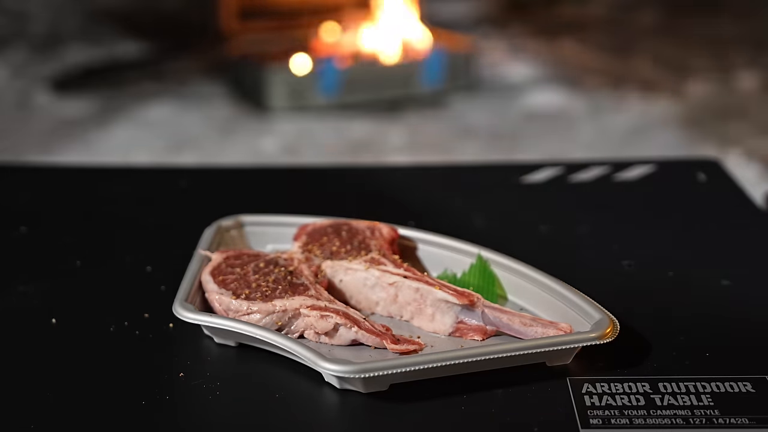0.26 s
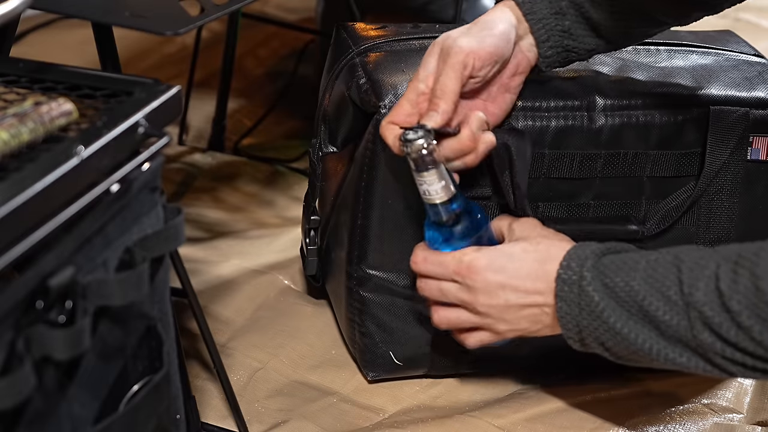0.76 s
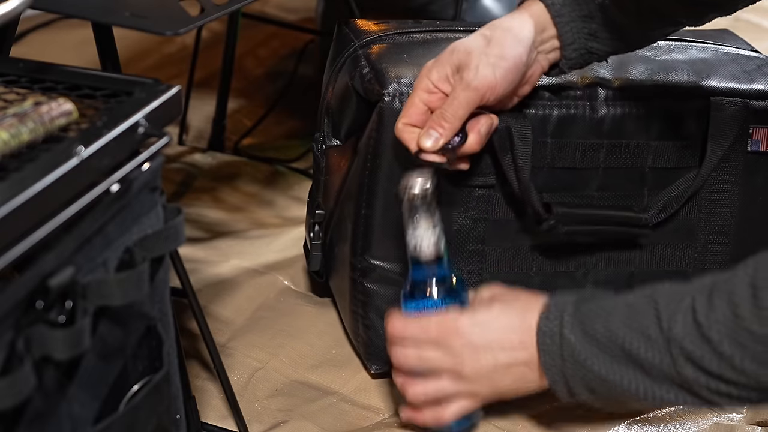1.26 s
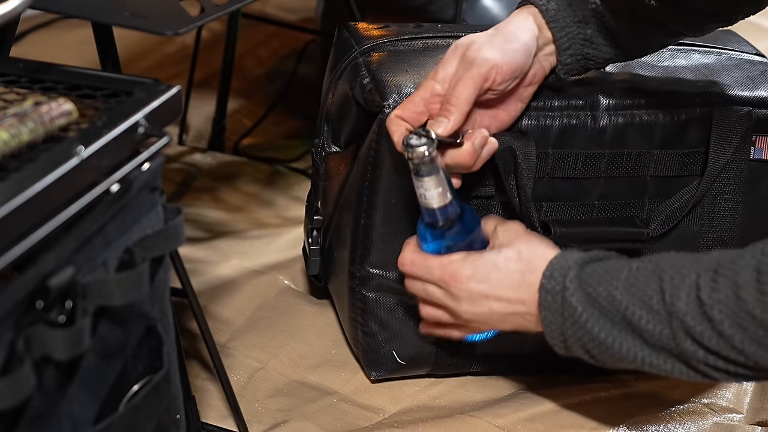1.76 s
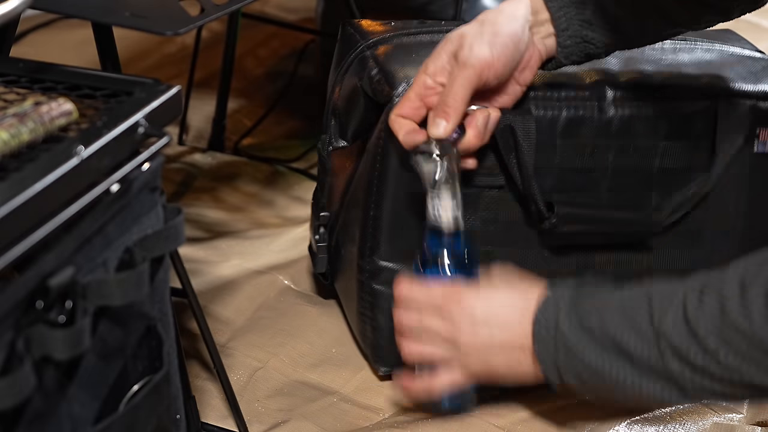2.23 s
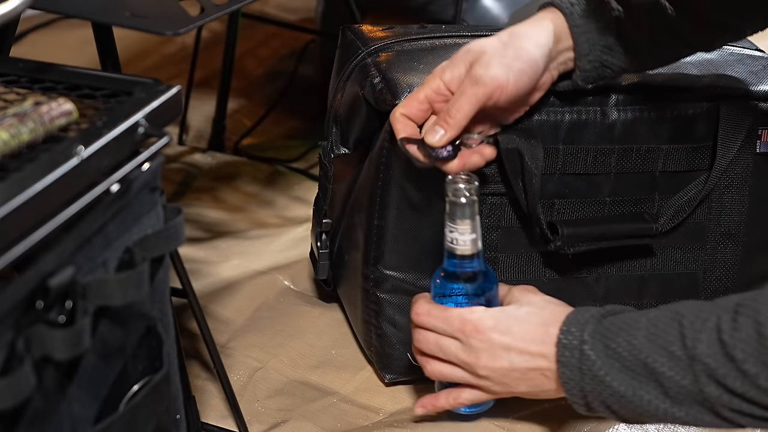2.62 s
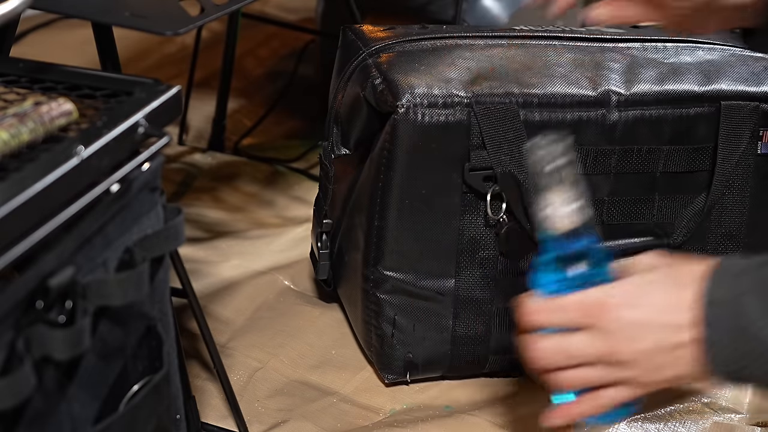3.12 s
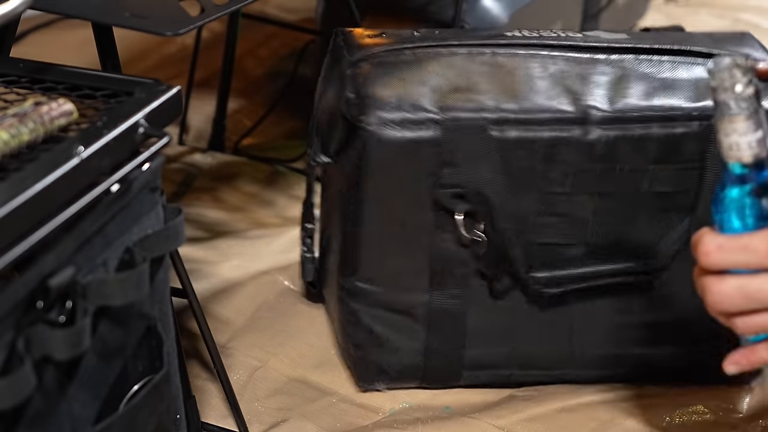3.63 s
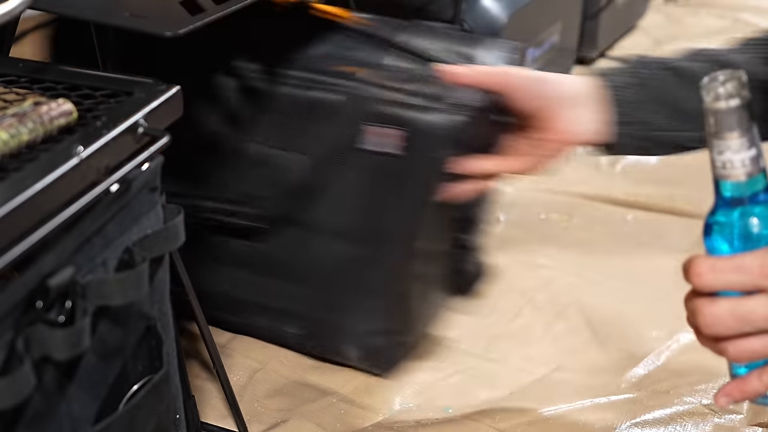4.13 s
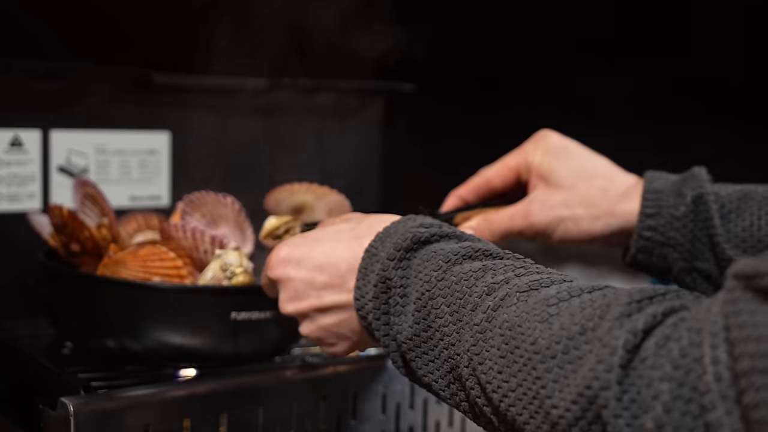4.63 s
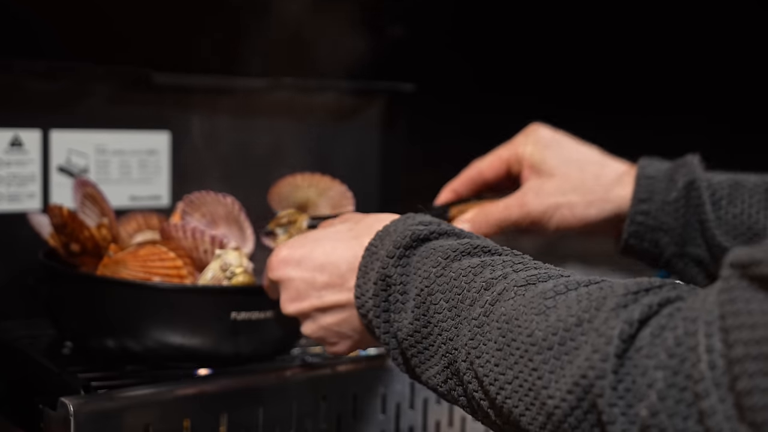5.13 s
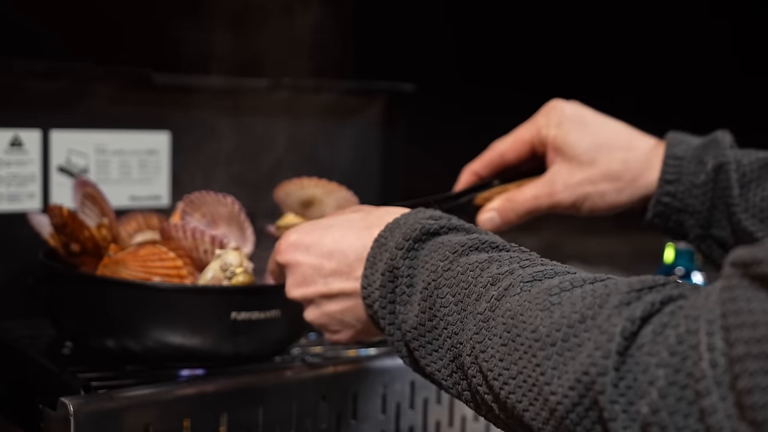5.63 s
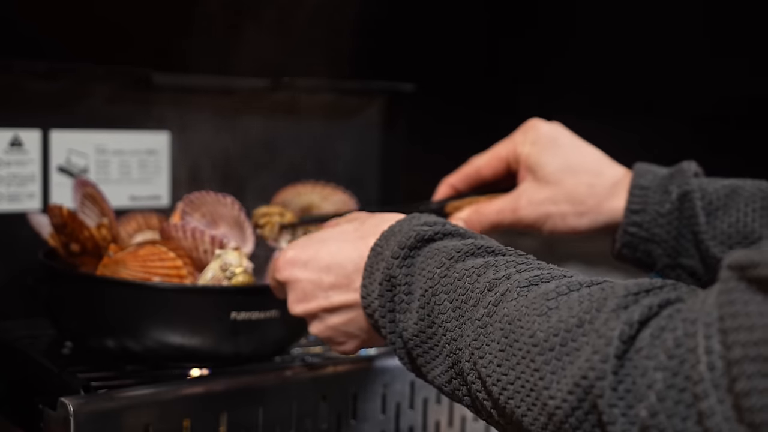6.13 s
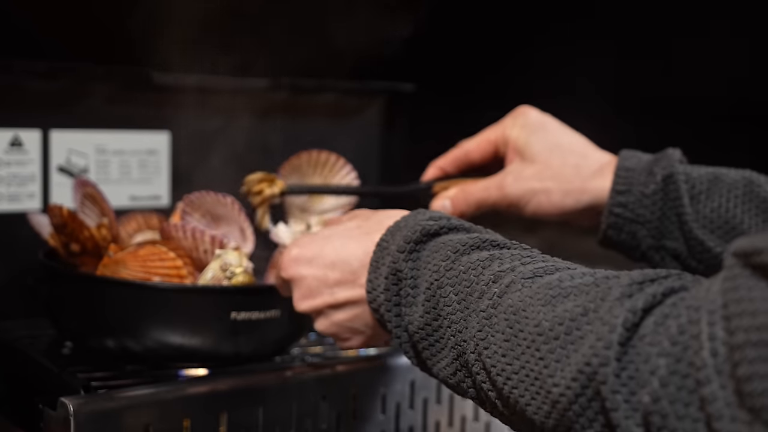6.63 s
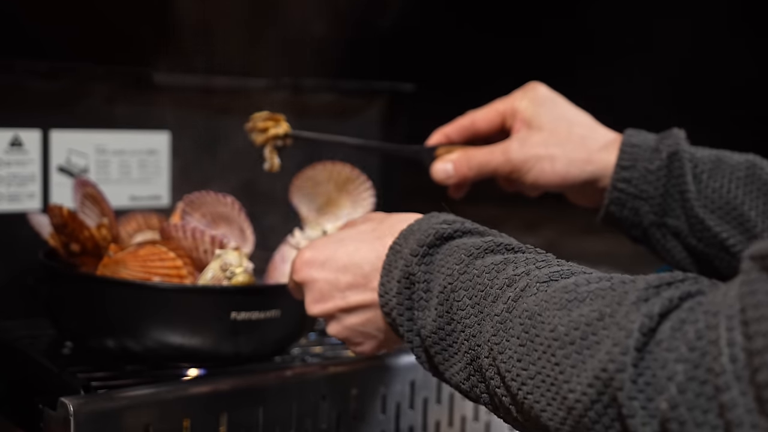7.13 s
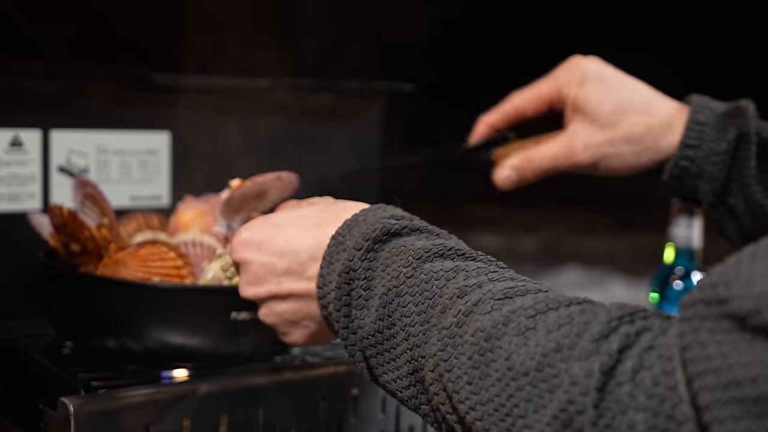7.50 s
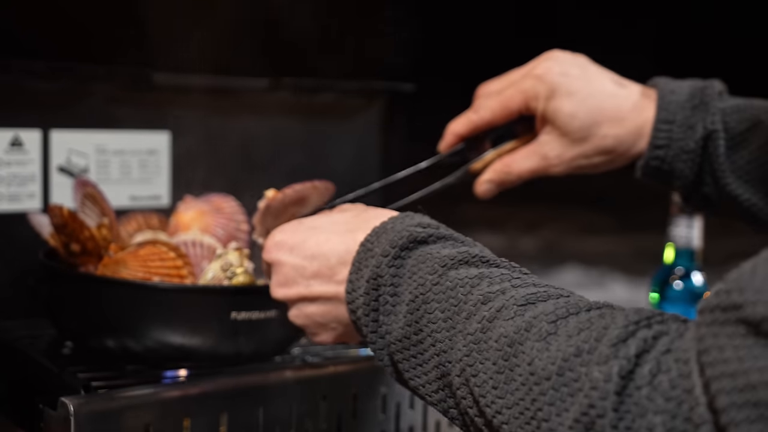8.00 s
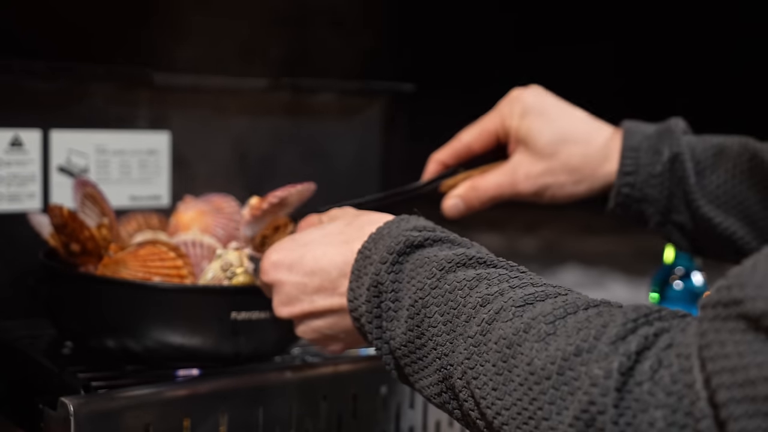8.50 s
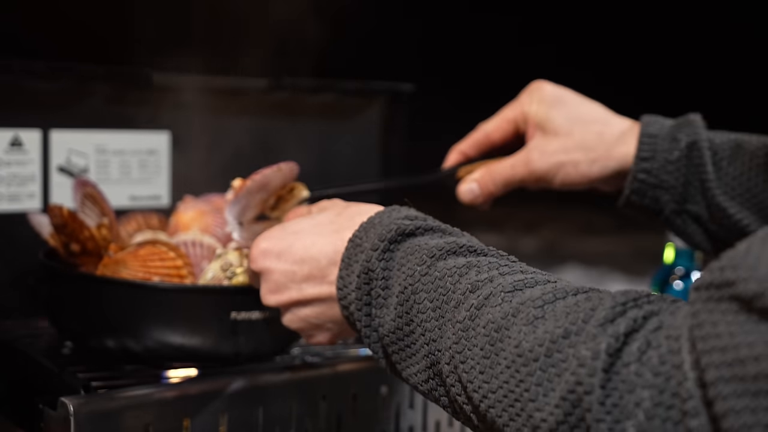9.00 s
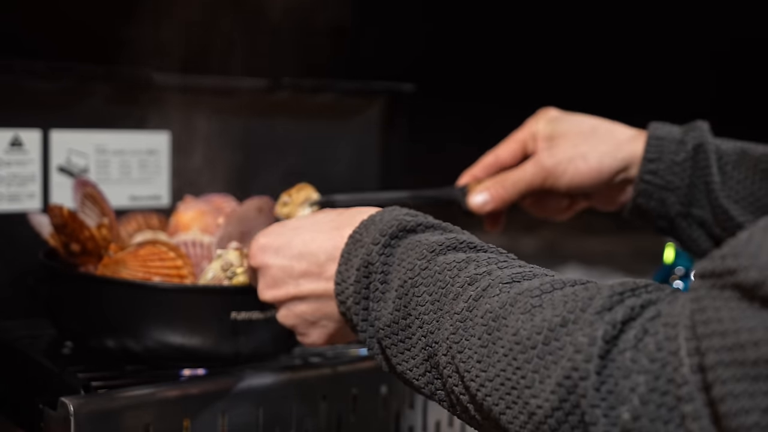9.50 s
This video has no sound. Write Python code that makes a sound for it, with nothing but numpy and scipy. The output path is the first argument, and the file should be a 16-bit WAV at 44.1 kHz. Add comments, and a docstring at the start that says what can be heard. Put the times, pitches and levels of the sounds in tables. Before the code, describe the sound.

A bottle cap is pried off with a pop, a bag is dragged, then metal tongs click and scrape on scallop shells.

```python
"""Evening in a tent, over a low rush of air. First a wood fire flutters, snaps and sings with steam.
A sleeve brushes past; an opener clicks on a bottle, gas leaks, and at 2.25 s the cap pops, rings and
drops. From 3.45 s a cooler bag is dragged over the groundsheet, its friction following its speed.
From 4.5 s tongs scrape and click on scallop shells over a pan simmering on a low gas flame; last, a
shell knocks on the pan. Impacts are noise bursts and damped modes; sliding is grainy filtered noise."""
import sys
import numpy as np
from scipy import signal
from scipy.fft import rfft, irfft, next_fast_len
from scipy.io import wavfile

SR = 44100
rng = np.random.default_rng(int(sys.argv[2]) if len(sys.argv) > 2 else 0)


def pcm_store(signal):
    """Save signal as 16-bit PCM."""
    levels = np.round(np.clip(np.atleast_2d(signal), -1, 1) * 32767)
    wavfile.write(sys.argv[1], SR, levels.astype(np.int16).T)


N = 429971
TIME = np.arange(N) / SR
STOVE_FROM_S = 4.5

# spectra of rushing air, soft hiss and metal on shell: (frequency [Hz], level [dB])
AIR_SPECTRUM = [(15, -46), (25, -37), (59, -8.5), (112, 1.5), (217, -7.5), (252, -10.5), (284, -9),
                (395, -14.5), (591, -14.5), (687, -13.5), (900, -32), (1170, -43), (1980, -120)]
HISS_SPECTRUM = [(300, -30), (600, -5), (900, 1.5), (1500, -0.5), (2200, -3), (3000, -2.5), (4600, -6),
                 (7000, -9), (10000, -12), (16000, -20)]
SCRAPE_SPECTRUM = [(300, -22), (1000, -4.5), (2000, 1.5), (2800, 2), (4500, -6), (6300, -3.5), (9000, 0.5),
                   (13000, 1), (16000, -4)]
# normal modes of the covered ground and the tongs: (frequency [Hz], level [dB], t60 [s])
GROUND_MODES = [(160, -13, 0.065), (383, 1, 0.03), (607, 3.5, 0.041), (880, 4, 0.029), (1130, -4.5, 0.027),
                (1260, 0, 0.016)]
TONG_MODES = [(1980, 6, 0.045), (3660, 8.5, 0.014), (4130, 5, 0.043), (4440, -2, .1), (4605, 9, 0.059),
              (5800, 7, 0.067), (6204, -1, 0.091), (6480, 13, 0.041), (7650, 5.5, 0.071), (8290, -3, 0.15),
              (10240, -6, 0.12), (11800, -7, 0.14)]


def amp(db):
    """Amplitude ratio of a level in decibels."""
    return 10 ** (np.asarray(db) / 20)


def unit(x):
    """Normalisation to unit energy."""
    return x / np.sqrt(np.sum(x ** 2) + 1e-20)


def add(track, s, sound):
    """Superposition: a sound joins the track at s seconds."""
    at = max(0, int(round(s * SR)))
    track[at:at + len(sound)] += sound[:max(0, N - at)]


def coloured(x, spectrum, tilt_db=0):
    """Minimum-phase filtering through (frequency [Hz], level [dB]) points, tilted per octave."""
    size = 2 * next_fast_len(len(x))
    octave = np.log2(np.maximum(np.arange(size // 2 + 1) * SR / size, 10))
    hz, db = np.transpose(spectrum)
    gain_db = np.interp(octave, np.log2(hz), db) + tilt_db * (octave - octave.mean())
    cepstrum = irfft(np.log(amp(gain_db)))
    cepstrum[1:size // 2] *= 2   # folding the cepstrum makes the filter causal
    cepstrum[size // 2 + 1:] = 0
    return irfft(rfft(x, size) * np.exp(rfft(cepstrum)))[:len(x)]


def resonate(x, hz, q):
    """Second-order resonance with unit gain at its peak."""
    return signal.lfilter(*signal.iirpeak(min(hz, .4 * SR), q, fs=SR), x)


def drift(rate):
    """Random modulation: lines join Gaussian values drawn `rate` times a second."""
    return np.interp(TIME * rate, np.arange(N), rng.standard_normal(N))


def grains(size, spread_db):
    """Heavy-tailed noise: the wider the spread of strengths, the more it crackles."""
    return rng.standard_normal(size) * amp(spread_db * np.minimum(rng.exponential(1, size), 6))


def noise(spectrum, spread_db=0):
    """Stationary coloured noise of unit rms."""
    return unit(coloured(grains(N, spread_db), spectrum)) * np.sqrt(N)


def crack(spectrum, t60):
    """Contact transient: an exponentially decaying noise burst of unit energy."""
    t = TIME[:SR // 10]
    envelope = (1 - np.exp(-t / 0.00011)) * amp(-60 * t / t60)
    return unit(coloured(rng.choice([-1, 1], len(t)) * envelope, spectrum))


def ring(modes, scatter_db):
    """Free vibration of damped modes, of unit energy; the grip shifts strength and pitch at each blow."""
    hz, db, t60 = np.transpose(modes)[:, :, None]
    t = TIME[:SR // 2]
    strength = amp(db + scatter_db * rng.standard_normal(db.shape)) * rng.choice([-1, 1], db.shape)
    hz = hz * (1 + .001 * rng.standard_normal(hz.shape))
    return unit(np.sum(strength * amp(-60 * t / t60) * np.sin(2 * np.pi * hz * t), axis=0))


def clicks(contacts, crack_t60, mid_db, resonance_db, q, modes=None):
    """Impact excitation: a crack with a contact resonance, plus any modes of the struck body."""
    out = np.zeros(N)
    for s, db, body_db, treble_db, hz, *ring_db in contacts:
        spectrum = [(200, body_db - 18), (700, body_db), (1900, body_db + 2.5), (3200, mid_db),
                    (6500, mid_db), (9000, treble_db), (15000, treble_db - 2)]
        crunch = crack(spectrum, crack_t60)
        resonance = amp(resonance_db) * unit(resonate(crunch, hz, q))
        add(out, s + 0.00093, amp(db) * unit(crunch + resonance))
        if modes:
            add(out, s + .001, amp(db + ring_db[0]) * ring(modes, scatter_db=2.5))
    return out


def strokes(swells, spectrum, spread_db):
    """Grainy noise under Gaussian envelopes, each with its own spectral tilt."""
    out, t = np.zeros(N), TIME[:SR // 2]
    for s, half_width, db, tilt_db in swells:
        hiss = unit(coloured(grains(len(t), spread_db), spectrum, tilt_db)) * np.sqrt(len(t))
        envelope = np.exp(-((t - t.mean()) / half_width) ** 2 / 2)
        add(out, s - t.mean(), amp(db) * hiss * envelope)
    return out


def tent(x, echo_s, echo_db, tail_db, t60):
    """Convolution with the direct sound, one early reflection and a short diffuse tail."""
    tail_spectrum = [(100, -5), (1000, -3.5), (4000, 6), (9000, 6.5), (16000, 5)]
    t = TIME[:SR // 2]
    tail = rng.standard_normal(len(t)) * amp(-60 * t / t60) * np.clip((t - .003) / 0.0082, 0, 1)
    response = amp(tail_db) * unit(coloured(tail, tail_spectrum))
    add(response, 0, np.ones(1))
    add(response, echo_s, amp([echo_db]))
    return signal.fftconvolve(x, response)[:N]


def air_and_burner():
    """Flow noise: a low rush of air, later of the burner, under a faint fizz; both waver."""
    # low rush at the stove: (time [s], relative level [dB])
    stove_rush = [(4.6, -58), (4.84, -58), (7.28, -59.5), (7.84, -62), (9.7, -58.5)]
    at_stove = TIME > STOVE_FROM_S
    stove_db = np.interp(TIME, *np.transpose(stove_rush)) + 2
    rush = amp(np.where(at_stove, stove_db, -56) + 2 * drift(24)) * noise(AIR_SPECTRUM)
    fizz = amp(np.where(at_stove, -56, -56.5) + .4 * drift(33)) * noise(HISS_SPECTRUM, spread_db=2.5)
    return rush + fizz


def whistle(hz, waver):
    """Random amplitude and frequency modulation make a thin tone that keeps breaking up."""
    strength = drift(300)
    pitch = hz * (1 + waver * (drift(15) + drift(900)))
    return strength * np.sin(2 * np.pi * np.cumsum(pitch) / SR)


def fire():
    """Combustion noise flutters, wood snaps in impulses, and steam sings out of a log."""
    # flames: (frequency [Hz], level [dB])
    flame_spectrum = [(100, -19), (220, -2.5), (330, 0.5), (500, -9.5), (1000, -21), (4000, -15.5),
                      (16000, -21)]
    # wood snapping: (time [s], relative level [dB], body [dB], treble [dB], resonance [Hz])
    wood_snaps = [(0.056, -28, -30.5, -12, 6300), (0.128, -36, -25, -4, 2150),
                  (0.173, -27.5, -3, -12, 3510), (0.244, -31.5, -6, -17, 9830)]
    flames = amp(-52.5) * noise(flame_spectrum, spread_db=2.5) * amp(2 * drift(20.6))
    steam = amp(-47) * whistle(6190, waver=0.016) + amp(-44) * whistle(14300, waver=.02)
    steam += amp(-49) * noise([(1000, -2), (5000, -1), (16000, -12)])
    swell = np.interp(TIME, [.27, .35, .44, .52], [0.055, 0.21, 1, 0.96])
    snaps = amp(7) * clicks(wood_snaps, crack_t60=0.032, mid_db=-18.5, resonance_db=7, q=6)
    snaps = tent(snaps, echo_s=0.0087, echo_db=-1, tail_db=-6, t60=0.18)
    fade_out = np.interp(TIME, [.52, .533], [1, 0])
    return (flames + swell * steam + snaps) * fade_out


def sleeve():
    """Friction of cloth: a soft hiss and a low flapping with each move of the arm."""
    # arm moves: (centre time [s], half width [s], level [dB], tilt [dB/octave])
    moves = [(.47, .08, -50.5, 3.5), (1.36, .07, -51, 2), (2.43, .06, -50.5, 1), (2.947, .04, -50, 3),
             (3.157, 0.1, -49, 2), (3.32, 0.1, -48.5, 2.7)]
    flapping = sum(amp(db - 3) * np.exp(-((TIME - s) / half_width) ** 2 / 2)
                   for s, half_width, db, _ in moves)
    return strokes(moves, HISS_SPECTRUM, spread_db=3.1) + flapping * noise(AIR_SPECTRUM)


def bottle():
    """Impacts excite the modes of opener and cap; gas under pressure hisses through the broken seal."""
    # the opener bites on cap and glass, then the cap tears off the lip:
    # (time [s], relative level [dB], body [dB], treble [dB], resonance [Hz], ring [dB re crack])
    bites = [(.583, -22.5, -3, -12, 3500, -13), (.656, -8, -13, -18, 3400, -15),
             (1.078, -28, -34, -8, 2180, -14), (1.148, -24.5, -19, -17, 2950, -18),
             (1.21, 3.5, -23, -12, 5940, -28), (1.632, -16, -9, -2.5, 4560, -8),
             (1.715, -28, -23, -21, 4600, 0), (1.763, -22.5, -5, -7, 2920, -3.5),
             (1.7845, 0, -14.5, -17, 3150, -5.5), (2.134, -26.5, -15.5, -24, 2660, -18),
             (2.196, -28, -13, -19, 3500, -7), (2.344, -21, -19.5, -21.5, 4650, 3.5),
             (2.411, -22.5, -12, -7, 4610, -6), (2.731, -29, -2, -14, 13000, -6.5)]
    tears = [(2.2479, -10.5, -3, -4, 6620, -5), (2.2566, -3.5, -10.5, -8, 3830, -1),
             (2.2695, -8, -27, -14, 7700, 3), (2.2824, -0.5, -43, -21.5, 7560, -13)]
    # normal modes: (frequency [Hz], level [dB], t60 [s])
    opener_modes = [(1437, -4.5, 0.033), (2310, -17, .04), (2840, 0, .05), (3120, -1.5, 0.042),
                    (3220, 1.5, .05), (4530, -7, 0.091), (4690, 1.5, 0.076), (5100, -9.5, 0.061),
                    (6700, -14, .1)]
    cap_modes = [(3912, 0, 0.22), (3954, 7.5, 0.26), (4560, 5, 0.058), (4530, -4, 0.24), (5820, -9, .1),
                 (7200, -15, .18), (7700, 2.5, 0.11), (7470, -5, 0.17), (8587, -9, .16), (10110, -5, .14)]
    # puffs of gas: (centre time [s], half width [s], level [dB], tilt [dB/octave])
    puffs = [(0.864, .008, -31.5, 15.5), (0.945, .04, -38, 4), (0.977, .018, -34, 3.5),
             (2.273, 0.013, -21, 4.5), (2.305, .012, -33, -3), (2.35, .02, -43, -4.5)]
    # their hiss: (frequency [Hz], level [dB])
    gas_spectrum = [(500, -22), (2500, -7), (4500, -8), (8500, 2), (12000, -0.5), (16000, -6)]
    seal_breaks_s = .859
    prying = clicks(bites, crack_t60=0.019, mid_db=-18, resonance_db=-4.5, q=8.6, modes=opener_modes)
    pop = clicks(tears, crack_t60=0.024, mid_db=-13, resonance_db=-5.5, q=14, modes=cap_modes)
    gas = strokes(puffs, gas_spectrum, spread_db=5) * (TIME > seal_breaks_s)
    direct = amp(9.5) * prying + amp(10.5) * pop + gas
    return tent(direct, echo_s=.0085, echo_db=-9.5, tail_db=-4, t60=0.22)


def bumps():
    """Soft impacts: a few damped cycles and a slap that rings the ground; deep bass does not radiate."""
    # hand, bottle and bag: (time [s], relative level [dB], pitch [Hz], relative slap level [dB])
    blows = [(0.811, -36, 89, -28), (1.214, -30, 114, -25), (1.774, -27.5, 255, -13),
             (2.086, -38.5, 185, -12.5), (2.251, -21.5, 170, -14), (2.261, -16, 73, -25),
             (3.038, -9, 161, -6), (3.136, -33, 104, -9), (3.397, -27.5, 171, -9.5), (3.428, -32, 175, -26),
             (3.471, -28.5, 136, -22), (3.989, -22, 124, -4.5), (4.269, -22.5, 158, -15),
             (4.49, -27, 174, -15)]
    # dull slap: (frequency [Hz], level [dB])
    slap_spectrum = [(60, -11), (250, 2), (400, 2), (800, -9.5), (1250, -12), (1600, -22), (5000, -31),
                     (16000, -43.5)]
    decay_cycles = 4.7
    out, t = np.zeros(N), TIME[:SR // 5]
    for s, db, hz, slap_db in blows:
        add(out, s, -amp(db + 6) * np.sin(2 * np.pi * hz * t) * amp(-60 * t * hz / decay_cycles))
        add(out, s, amp(db + slap_db + 23) * crack(slap_spectrum, t60=0.03))
        add(out, s, amp(db + slap_db + 17) * ring(GROUND_MODES, scatter_db=-1.5))
    out = signal.sosfilt(signal.butter(3, 55, "high", fs=SR, output="sos"), out)
    return tent(out, echo_s=0.0076, echo_db=-12.5, tail_db=-1, t60=0.12)


def cap_landing():
    """Inelastic rebound: the cap hops, and each knock excites the modes of the covered ground."""
    # contacts with the ground: (time [s], relative level [dB])
    bounces = [(2.464, -2), (2.4691, -1), (2.517, -34), (2.539, -25), (2.562, -20.5), (2.655, -28)]
    # one knock: (frequency [Hz], level [dB])
    knock_spectrum = [(30, -48), (90, -12), (350, -6.5), (700, 2), (1300, 2.5), (1800, -15), (2900, -11),
                      (6000, -20.5), (16000, -34)]
    out = np.zeros(N)
    for s, db in bounces:
        add(out, s + 0.00091, amp(db + 13) * ring(GROUND_MODES, scatter_db=-0.5))
        add(out, s + .001, amp(db + 11.5) * crack(knock_spectrum, t60=0.054))
    out = signal.sosfilt(signal.butter(2, 55, "high", fs=SR, output="sos"), out)
    return tent(out, echo_s=0.004, echo_db=-25, tail_db=-6.5, t60=0.17)


def bag():
    """Sliding friction: stiff fabric rubs, creases and rumbles, louder the faster it is pulled."""
    # fabric on the groundsheet, and the rumble below it: (frequency [Hz], level [dB])
    rub_spectrum = [(590, -23), (1000, -3), (1320, 1.5), (1430, -1.5), (2250, -3.5), (3120, -5), (3840, -4),
                    (12800, -6), (16000, -9)]
    rumble_spectrum = [(30, -31), (70, -6), (150, 9.5), (300, 0), (900, 0), (1300, -13), (2000, -22),
                       (5000, -52)]
    # the bag's skin buzzes in fits: (frequency [Hz], quality factor [1], relative level [dB])
    skin_resonances = [(1310, 7.1, -9), (3220, 5, -3)]
    start_s, fastest_s, stop_s = 3.45, 4.027, 4.39
    gather_db_per_s, slow_db_per_s, brake_db_per_s = 40, 32.5, 128
    creases_per_s = 110
    speed_db = -(gather_db_per_s * np.maximum(fastest_s - TIME, 0)
                 + slow_db_per_s * np.maximum(TIME - fastest_s, 0)
                 + brake_db_per_s * np.maximum(TIME - stop_s, 0))
    creases = (rng.random(N) < creases_per_s / SR) * amp(3 * rng.standard_normal(N))
    rub = noise(rub_spectrum, spread_db=2) * amp(drift(70))
    rub += amp(14.5) * signal.fftconvolve(creases, crack(rub_spectrum, t60=0.0055))[:N]
    scuffs = sum(amp(db + 5 * drift(35)) * resonate(rub, hz, q) for hz, q, db in skin_resonances)
    friction = amp(-22 + speed_db) * (rub + .5 * scuffs)
    rumble = amp(-30.5 + 0.88 * speed_db + 3.25 * drift(50)) * noise(rumble_spectrum)
    pulling = np.clip((TIME - start_s) / 0.022, 0, 1) * (TIME < STOVE_FROM_S)
    return (friction + rumble) * pulling


def scraping():
    """Stick-slip friction on the shell's ribs drives the tongs' modes, each swelling and fading."""
    # tongs sliding: (centre time [s], half width [s], relative level [dB], tilt [dB/octave])
    slides = [(4.525, 0.0055, -40.5, -4), (4.84, 0.048, -47, 7), (5.14, 0.061, -42, -3),
              (5.3, 0.091, -41.5, 0), (5.74, 0.078, -48.5, 3), (5.98, 0.058, -47.5, -2.5),
              (6.24, 0.036, -44, -2), (6.38, 0.047, -47.5, 0.5), (6.49, 0.017, -39, 4),
              (6.83, 0.024, -34, 1.5), (6.91, 0.041, -40, 0), (7.415, 0.0064, -40.5, -3.5),
              (7.775, .012, -34, 3), (7.89, 0.024, -35, 3), (8.07, 0.076, -48.5, 3.5),
              (8.7, .009, -40.5, -1.5), (9.2, 0.45, -56, -5)]
    catches_per_s, catch_t60 = 60, 0.011
    catch_envelope = amp(13 - 60 * TIME[:SR // 20] / catch_t60)
    catches = signal.fftconvolve(rng.random(N) < catches_per_s / SR, catch_envelope)[:N]
    grit = strokes(slides, SCRAPE_SPECTRUM, spread_db=3) * (amp(2.8 * drift(160)) + catches)
    singing = sum(amp(db + 5 * drift(12)) * resonate(grit, hz, q=25) for hz, db, _ in TONG_MODES[1:])
    return amp(-9) * (grit + .5 * singing)


def sizzle():
    """Shot noise: juice spits in the hot pan in sparse, tiny ticks."""
    # one tick: (frequency [Hz], level [dB])
    spit_spectrum = [(2000, -18), (5000, -5), (9000, -6), (16000, -1)]
    spits_per_s = 14
    spits = (rng.random(N) < spits_per_s / SR) * (TIME > STOVE_FROM_S)
    strength = amp(9.4 * rng.standard_normal(N))
    return amp(-50) * signal.fftconvolve(spits * strength, crack(spit_spectrum, t60=0.0073))[:N]


def grazes():
    """Contact resonance: each faint chance touch of the tongs is pitched by its spot on a shell."""
    grazes_per_s, span_s = 5, TIME[-1] - STOVE_FROM_S
    out = np.zeros(N)
    for when, force, spot in rng.random((int(grazes_per_s * span_s), 3)):
        touch = crack(SCRAPE_SPECTRUM, t60=0.04)
        resonance = resonate(touch, 3000 * 2 ** (1.4 * spot), q=5.4)
        add(out, STOVE_FROM_S + when * span_s, amp(-32 + 9 * force) * unit(touch + 4 * resonance))
    return out


def scallops():
    """Struck tongs and shell ring over scrapes and sizzle; a near reflection doubles every click."""
    # tongs tap on shells, then a shell knocks on the pan:
    # (time [s], relative level [dB], body [dB], treble [dB], resonance [Hz], ring [dB re crack])
    taps = [(5.229, -14.5, -29, -17, 8900, -24), (5.434, -10.5, -35, -10, 4500, -10),
            (5.504, -14.5, -25, -16, 4470, -7), (5.543, -10.5, -20.5, -15, 4520, -14),
            (5.589, -13.5, -22, -20, 3700, -7), (5.698, -22, -27, -22.5, 5850, -7),
            (6.183, -20, -12, -15, 6400, -0.5), (6.476, -23, -25, -16, 8450, -22),
            (6.807, -19.5, -5.5, -10, 8100, -17), (7.689, -20.5, -14.5, -23.5, 1900, -5),
            (7.87, -9.5, -25, -8, 6200, -8), (7.901, -11.5, -26, -12, 8300, -7),
            (7.921, -14.5, -31, -11, 6100, -7), (8.025, -12, -30, -14, 12700, -1.5),
            (8.132, -19, -33, -14, 6340, -6), (8.739, -7.5, -22.5, -8.5, 12300, -12),
            (8.818, -11, -18, -19.5, 8250, -10)]
    knocks = [(9.471, -7, -11, -17.5, 1380, -6), (9.58, -23.5, 2, -32, 1500, -13)]
    # normal modes of shell on pan: (frequency [Hz], level [dB], t60 [s])
    shell_modes = [(863, -11, 0.058), (1170, -3.5, 0.054), (1420, -1, .04), (2242, -2, .05),
                   (2670, 3.5, 0.039), (3900, -14, 0.057), (5720, -21, .1), (6820, -10, 0.11),
                   (7500, -5, 0.12)]
    tongs = clicks(taps, crack_t60=0.021, mid_db=-17, resonance_db=-5.5, q=12, modes=TONG_MODES)
    shell = clicks(knocks, crack_t60=0.017, mid_db=-11.5, resonance_db=-0.5, q=6, modes=shell_modes)
    cooking = amp(9) * tongs + scraping() + sizzle() + grazes()
    return (tent(cooking, echo_s=.0077, echo_db=-4, tail_db=-4.5, t60=0.25)
            + tent(amp(12.5) * shell, echo_s=0.008, echo_db=-9.5, tail_db=-1.5, t60=0.15))


def scene():
    """The sources superpose at one point, alike in both channels."""
    mono = air_and_burner() + fire() + sleeve() + bottle() + bumps() + cap_landing() + bag() + scallops()
    return np.array([mono, mono])


def record(dry):
    """Hard clipping at full scale, then a steep low-pass filter."""
    low_pass = signal.ellip(10, .1, 70, 15900, fs=SR, output="sos")
    return signal.sosfilt(low_pass, np.clip(dry, -1, 1))


dry = scene()
out = record(dry)
pcm_store(out)
```